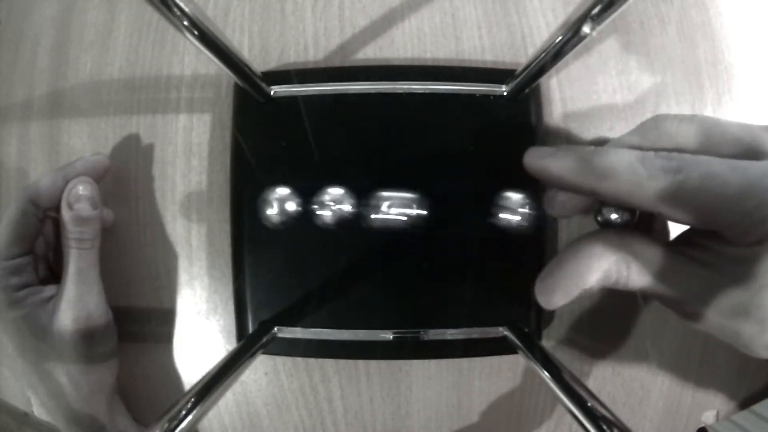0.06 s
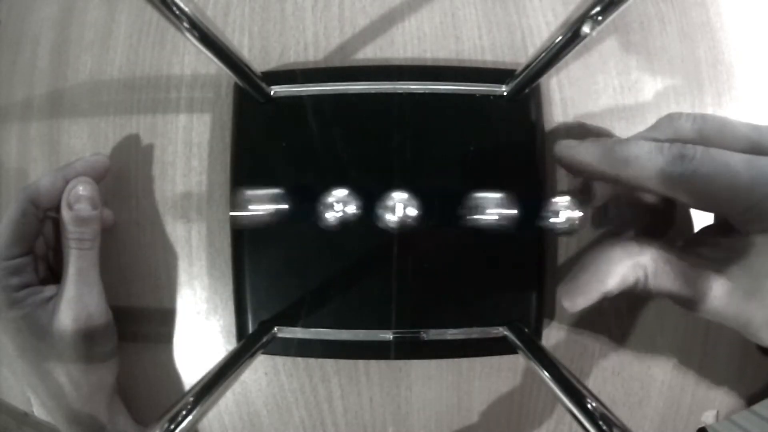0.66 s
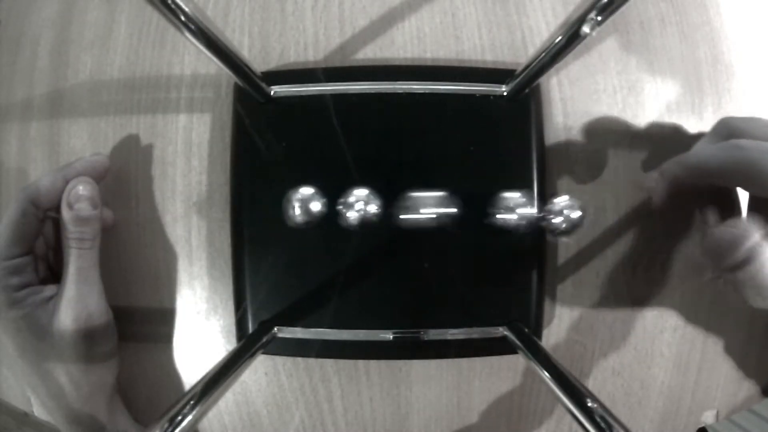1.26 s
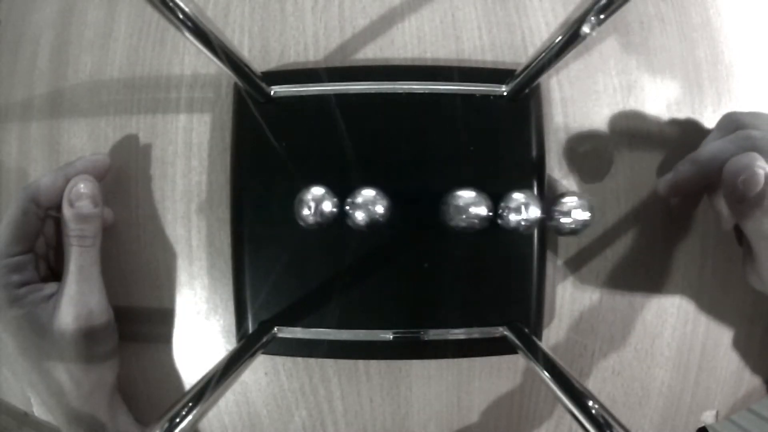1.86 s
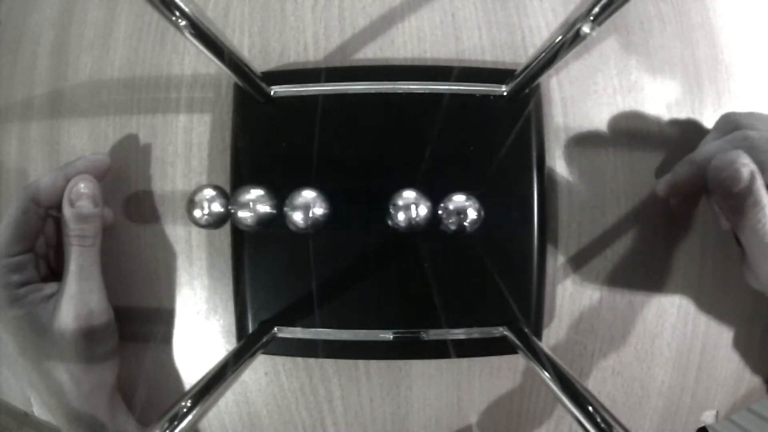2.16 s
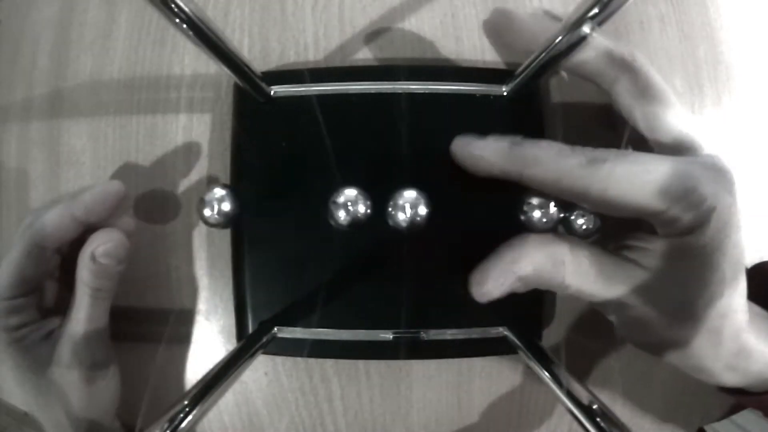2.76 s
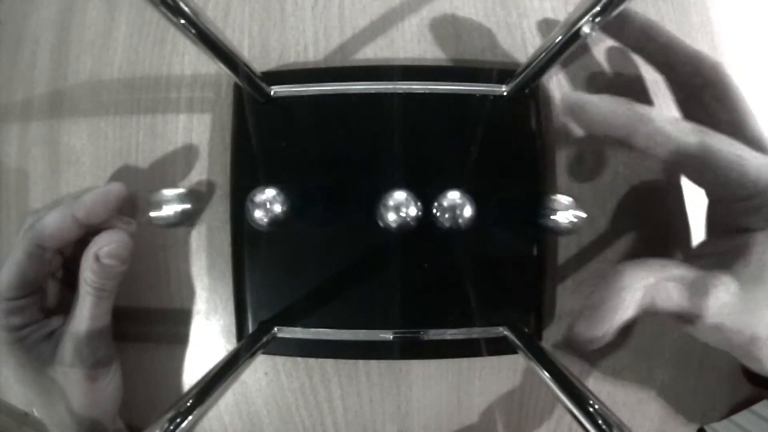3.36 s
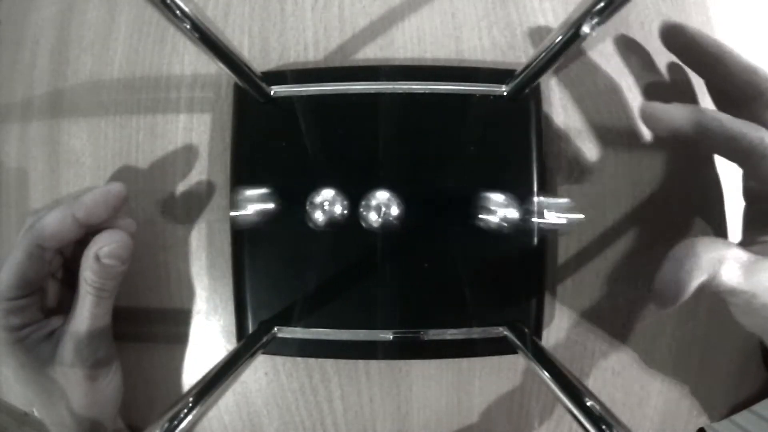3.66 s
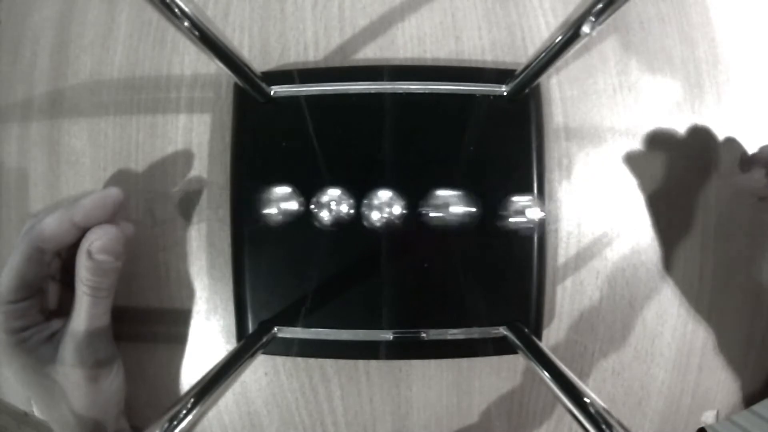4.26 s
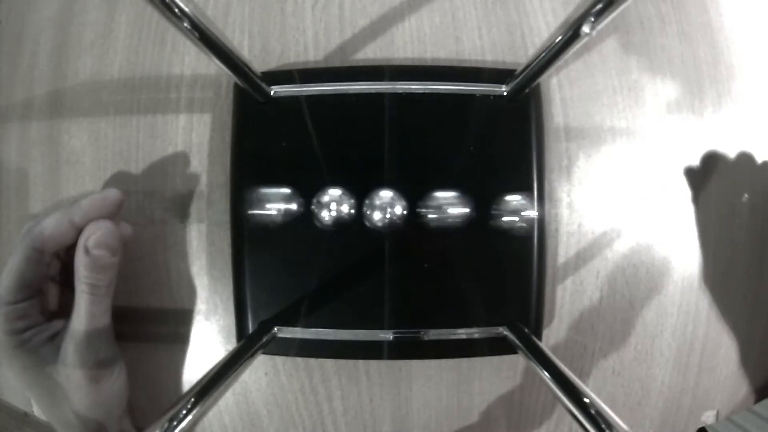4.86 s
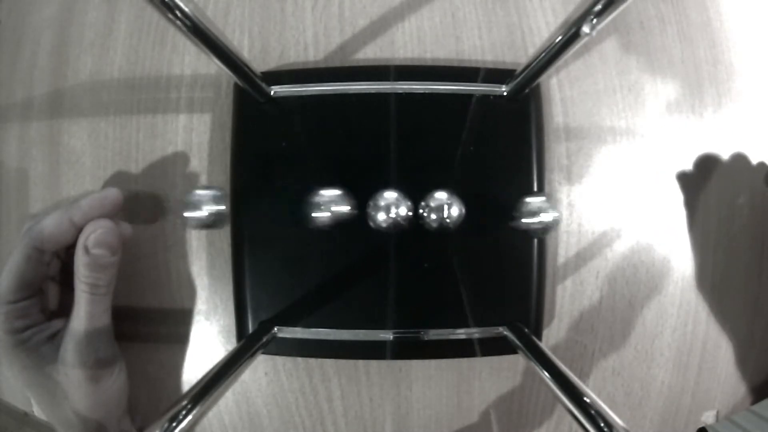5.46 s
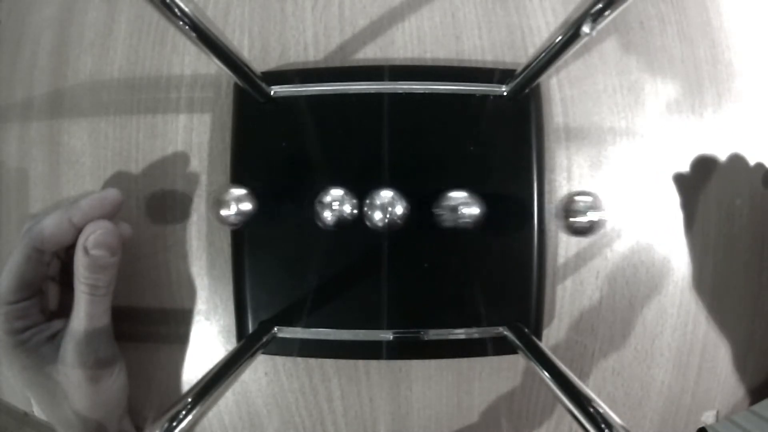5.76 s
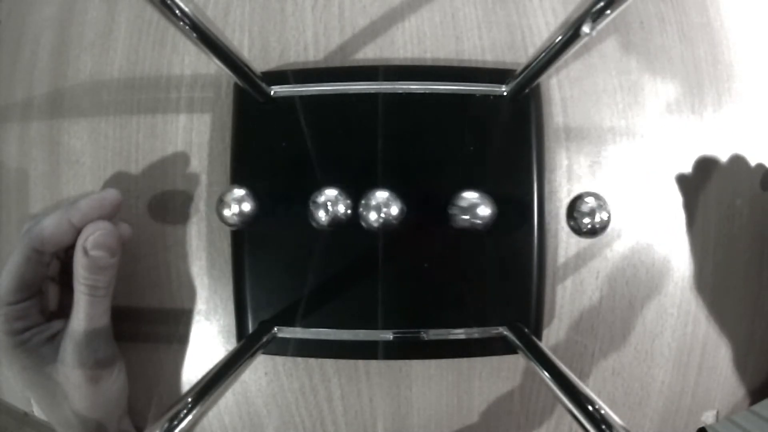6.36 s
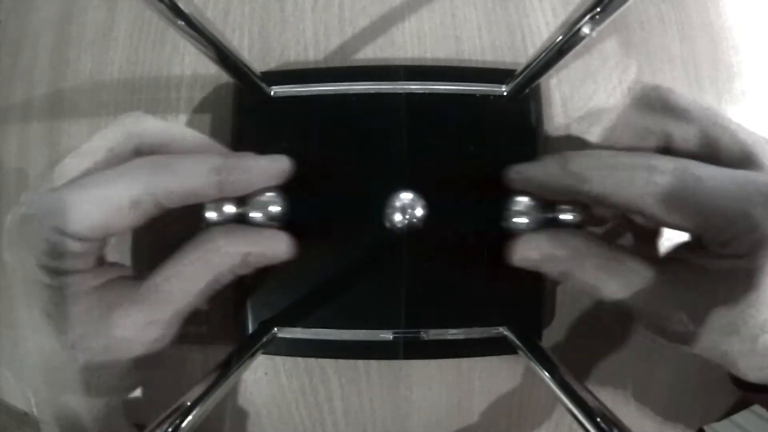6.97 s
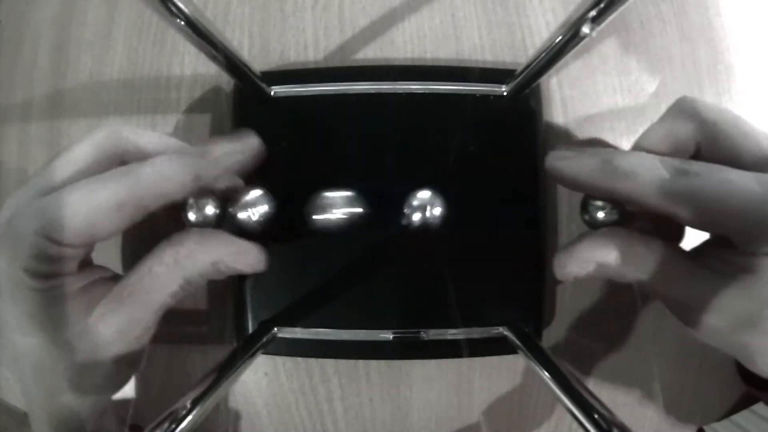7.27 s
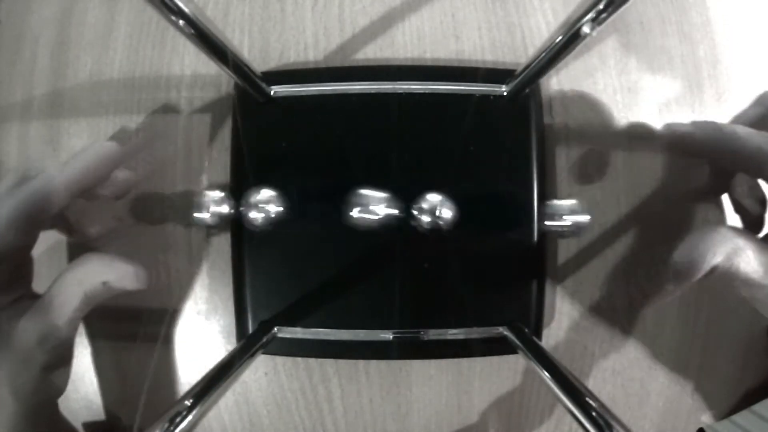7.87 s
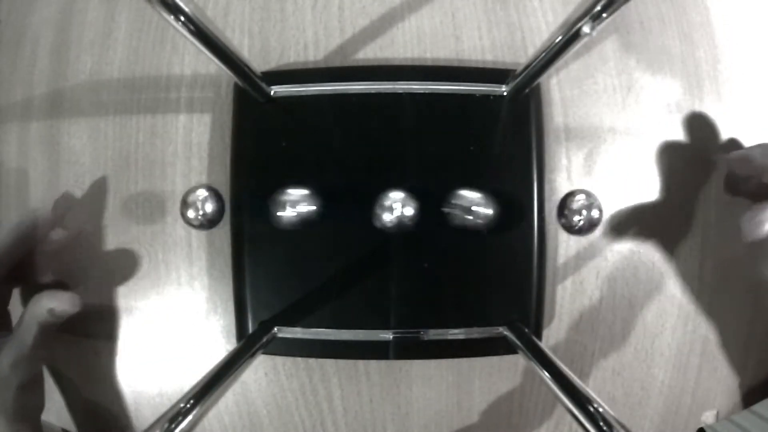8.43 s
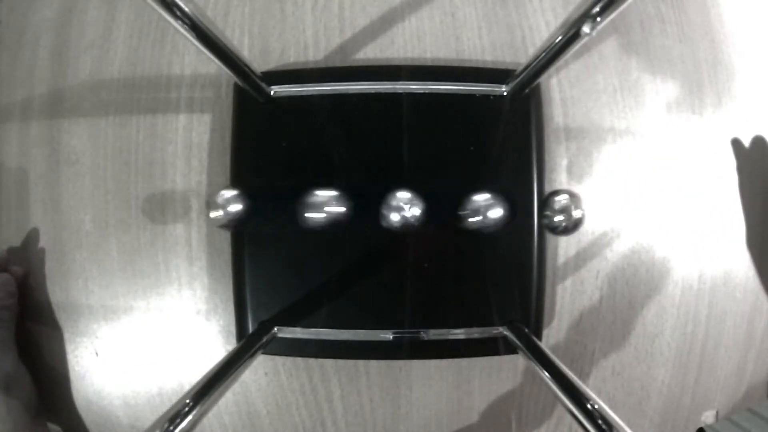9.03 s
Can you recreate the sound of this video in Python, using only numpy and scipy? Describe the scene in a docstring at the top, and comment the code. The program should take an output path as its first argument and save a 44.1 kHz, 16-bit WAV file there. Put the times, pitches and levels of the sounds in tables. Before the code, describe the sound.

Close up in a small, quiet room, a swinging-ball desk toy makes bright, irregular metal clicks with a little low rumble and creaking. After a short lull as the balls are handled, they clatter in an even rhythm of quick volleys that slowly weaken. The sound dips briefly, then a second round begins. Faint hiss, a thin whine and tiny electronic ticks lie underneath.

```python
"""A Newton's cradle on a wooden desk, heard from just above. First the steel balls clack out of step, as their
shifting load makes the base rumble and the frame creak. Fingers gather them up, then let go, and the balls
collide in fading volleys, three a second; after seven seconds a new, faster-fading run of volleys begins.
Twice, near 2.2 and 7 seconds, the whole sound briefly fades out and back in. Throughout, a nearby surface and
the small room answer each click, over hiss and a faint whine, joined by faint ticks and a drone."""
import sys
import numpy as np
from scipy import signal
from scipy.fft import rfft, irfft, next_fast_len
from scipy.io import wavfile
from scipy.ndimage import uniform_filter1d

SR = 44100
rng = np.random.default_rng(int(sys.argv[2]) if len(sys.argv) > 2 else 0)


def wrap_up_sound(samples):
    """Save the sound to the file named by the first command line argument, as 16-bit audio."""
    columns = np.atleast_2d(samples).T
    # keep every value between -1 and 1, then stretch to whole-number steps
    tamed = np.clip(columns, -1, 1)
    steps = np.round(tamed * 32767).astype(np.int16)
    wavfile.write(sys.argv[1], SR, steps)


N = 401310

# spectrum of a steel-on-steel contact: (frequency [Hz], relative level [dB])
CLICK_SPECTRUM = [(200, -41.5), (500, -15), (1000, 4.5), (1600, 0.5), (2150, 5), (2850, 4.5), (3200, 1.5),
                  (3800, 5.5), (4500, 1.5), (4950, 5), (5420, 3.5), (6600, 5.5), (8200, 2.5), (8950, 6.5),
                  (10100, -1), (11000, 0.5), (15000, -14)]
# lone contacts, out of step or in the hands:
# (time [s], relative level [dB], brightness [dB/octave], room share [dB])
SINGLE_CONTACTS = [ (0, -44.5, 4.5, 3), (.0925, -40.5, 3.5, 2), (.0991, -44, 0.5, 0.5), (.2, -39, 2, 0),
                   (.3141, -44.5, 2.5, 3), (.4227, -40, 2, 1.5), (.5159, -40.5, 0, 3.5),
                   (.557, -37.5, 4, -2.5), (.5906, -36, 3, 0.5), (.6298, -42, 3, 5.5),
                   (.6495, -40.5, .5, 1.5), (.7374, -42, 2, 4), (.8231, -39.5, 4.5, -.5),
                   (.8869, -43, 4.5, 0), (.9144, -38.5, 3, 2), (.9708, -40.5, 3, 4), (1.0573, -44, 2, 4.5),
                   (1.1325, -42, 1.5, 0.5), (1.2096, -45, 4, 0), (1.2364, -42, 3, 4),
                   (1.3014, -41.5, 4, 2.5), (1.309, -45, -0.5, 0), (1.3784, -45.5, 1, 3),
                   (1.3844, -45, 0.5, -2), (1.4398, -43.5, 2, 1), (1.5359, -48, 3, 2),
                   (1.5589, -44, 1, 3.5), (1.6365, -42.5, 2.5, 2.5), (1.6991, -42, 0.5, -0.5),
                   (1.7554, -44, 1, 0.5), (1.852, -50, 2.5, -2), (1.8795, -47.5, 2.5, 5.5),
                   (1.9655, -42, 0.5, 1), (2.0237, -43, 4.5, 0), (2.0617, -44, 2.5, 0), (2.1754, -54, 4, 6),
                   (2.1963, -49, 0.5, -4), (2.6118, -37.5, 0, -2), (2.9351, -39, 3, 1.5),
                   (2.9667, -35, 1, 2), (2.9957, -39.5, 3, -0.5), (3.3053, -30, 4.5, -1),
                   (7.2402, -41, 3, -.5), (7.3207, -36.5, 5.5, -4), (7.4101, -41.5, 3.5, -2),
                   (8.6603, -43, -0.5, 6), (8.983, -42, 2.5, 2.5)]
# contacts that recur in free swing: (first time [s], period [s], shortening [s/swing], swings [count],
# relative level [dB], loss [dB/swing], brightness [dB/octave], room share [dB])
SWING_CONTACTS = [ (3.2568, .3213, 0, 12, -40, 0.48, 1, 0.5),
                  (3.2898, .3222, .00006, 12, -35.5, 0.9, 1.5, 1.5),
                  (3.312, .324, .00011, 12, -32, 0.46, 1.7, 0),
                  (3.3496, .3252, .00019, 12, -41.5, 0.35, 3, .5),
                  (3.6312, .3242, .00011, 11, -36, -0.06, 2, 2),
                  (7.5528, .3202, .0005, 5, -42.5, 2, 2.5, 5.5), (7.568, .3226, 0, 5, -42, 1.5, 4.5, -1.5),
                  (7.6021, .3264, .0008, 5, -34.5, 1.4, 4, 1),
                  (7.629, .3268, .00076, 5, -38.5, 1.3, 1.5, 6.5), (7.6481, .3227, 0, 5, -35, 0.8, 2, 2.5),
                  (7.6876, .3205, 0, 5, -34.5, 1.5, 4, 1), (7.727, .317, 0.0013, 3, -43, 0.1, 1.5, 4)]
# high modes of the steel frame: (frequency [Hz], relative level [dB], 60 dB decay time [s])
STEEL_MODES = [(4868, -24, .25), (4910, -20, .25), (4965, -21, .3), (5195, -19, .15), (5275, -20, .2),
               (5942, -21, .25), (6116, -21, .25), (6498, -25, .25), (8880, -21, .04), (8965, -21, .1),
               (9110, -21, .05)]
# early reflections: (delay [s], relative level [dB], spread [s])
REFLECTIONS = [(.0042, -14, .002), (.0105, -6, .0022), (.0185, -15, .0012), (.0216, -11, .0018),
               (.027, -12, .005)]
# colour of the reflections and of the reverberation: (frequency [Hz], gain [dB])
WALL_GAIN = [(500, -3), (2800, -7), (4200, 1.5), (5200, 3), (8000, 4.5), (11000, -2.5), (15000, -1)]
ROOM_GAIN = [(300, 29), (1000, -10), (2700, -9), (4200, -3.5), (6000, -5.5), (8200, -5), (9200, -10),
             (15000, -3.5)]
# reverberation time: (frequency [Hz], 60 dB decay time [s])
ROOM_DECAY = [(300, 0.48), (2000, 0.22), (5000, 0.33), (9000, 0.29), (15000, 0.16)]
# lurches under hands and uneven swings: (time [s], hold [s], relative rumble [dB], relative creak [dB])
STAND_LURCHES = [ (0, .03, -46, -49), (0.308, .02, -43, -55), (0.564, 0.093, -42, -43),
                 (0.889, 0.036, -41.5, -49.5), (0.978, 0.045, -49, -55.5), (1.234, .01, -43.5, -48),
                 (1.552, 0.068, -41, -55.5), (1.865, 0.13, -52, -58.5), (2.95, 0.18, -55.5, -67.5),
                 (3.224, 0.14, -46.5, -57.5), (3.482, .02, -52, -77), (6.22, 0.027, -57.5, -62),
                 (6.83, 0.035, -55, -74), (6.986, 0.19, -59.5, -69), (7.266, 0.053, -48, -59),
                 (7.343, 0.023, -58, -48.5), (7.599, .15, -49.5, -49), (7.9, 0.033, -43.5, -51),
                 (8.001, 0.24, -49.5, -59.5), (8.278, 0.12, -44, -52), (8.566, 0.096, -44, -56.5),
                 (8.76, .24, -55, -61)]
# regular sway in free swing:
# (first time [s], period [s], hold [s], relative rumble [dB], relative creak [dB], loss [dB/sway])
STAND_SWAY = (4, 0.4, 0, -55.5, -61, .65)
# the base rocking on the desk: (frequency [Hz], relative level [dB])
BASE_SPECTRUM = [(20, -53), (50, -43), (66, -7), (81, 2), (96, -26), (113, -14), (140, -17), (300, -25),
                 (600, -35), (1500, -97)]
# low resonances of the frame: (frequency [Hz], bandwidth [Hz], gain [dB])
FRAME_MODES = [(190, 21, -10), (398, 117, -8), (582, 32, -11), (930, 254, -6), (899, 30, -1.5),
               (993, 25, -3), (2090, 330, -12.5), (3320, 230, -20)]
# slips in the frame: (time [s], peak level [dB], length [s], gain of the side resonances [dB])
FRAME_SLIPS = [(.586, -43.5, 0.017, -12), (0.625, -45, 0.025, -3), (0.682, -37, 0.0093, -6),
               (1.268, -44.5, .016, -12), (2.355, -53, .013, -9), (2.894, -55.5, 0.013, -20),
               (6.994, -53, .015, -8), (7.362, -41, 0.021, -31), (7.385, -43.5, .012, -20),
               (7.696, -44.5, 0.012, -12), (7.808, -42, 0.022, -11), (7.927, -45.5, 0.013, -6),
               (8.299, -45, 0.022, -7)]
# skin sliding on steel, and a finger knocking the frame: (frequency [Hz], relative level [dB])
SLIDE_SPECTRUM = [(300, -20), (600, -5), (900, 10.5), (1080, 0), (1250, 4), (1600, -13), (4000, -15),
                  (12000, -32)]
KNOCK_SPECTRUM = [(150, -23), (450, 3), (650, -7), (920, -2), (1200, -19), (1600, -6), (2000, -22),
                  (5000, -42)]
# runs of electronic ticks: (start [s], end [s])
TICK_RUNS = [(2.348, 6.9), (7.0075, 9.05)]
# partials of the electronic whine: (frequency [Hz], level [dB])
WHINE_PARTIALS = [(1997, -84), (4000, -79), (5001, -87), (5999, -79), (8000, -91)]
# distant drone: (time [s], pitch [Hz], fundamental level [dB], third harmonic level [dB])
DRONE_PATH = [(2.6, 64, -85, -90), (3.1, 66, -55, -93), (3.7, 63.7, -60.5, -92), (4.4, 50, -73, -92),
              (5.1, 51.6, -64.5, -74.5), (5.8, 52.2, -55.5, -72.5), (6.05, 55.3, -64.5, -55),
              (6.35, 54.9, -58, -68.5), (6.8, 55, -70, -65.5), (7.1, 56, -57, -72), (9.1, 58, -74, -80)]
# room rumble and hiss: (frequency [Hz], relative level [dB])
FLOOR_SPECTRUM = [(20, -5), (65, -4.5), (125, -9.5), (300, -13), (600, -17.5), (950, -22), (1500, -23),
                  (3200, -28), (4100, -26.5), (5400, -34.5), (6050, -23.5), (7200, -36.5), (9000, -34),
                  (15000, -45)]
# brief dips in level: (time [s], fall [s], recovery [s])
LEVEL_DIPS = [(2.228, 0.1, 0.078), (6.963, 0.092, 0.097)]

CRACK_S, BURST_SIZE = .0019, 1024  # a click's decay time; samples in a burst
BURST_HZ = np.fft.rfftfreq(BURST_SIZE, 1 / SR)
OCTAVES = np.log2(np.clip(BURST_HZ, 1500, 12000) / 6000)  # brightness pivots about 6 kHz


def balls(gain_db=22, room_db=-1):
    """Elastic impact: each contact radiates a crack, followed by frame ring, echoes and reverberation."""
    out = np.zeros(N)
    tails = room_tails()
    rings = [steel_ring() for _ in range(11)]
    for k, (s, db, brightness, share_db) in enumerate(contacts()):
        direct = amp(db + gain_db)
        sent = direct * amp(share_db)  # a pair of balls radiates unevenly, and hands shade it
        colour = along(CLICK_SPECTRUM, BURST_HZ) + brightness * OCTAVES  # shorter contacts are brighter
        reflected = colour + along(WALL_GAIN, BURST_HZ)
        add(out, s, direct * burst(colour, CRACK_S))
        add(out, s, sent * rings[k % len(rings)])
        for delay, echo_db, spread in REFLECTIONS:
            add(out, s + delay, sent * amp(echo_db) * burst(reflected, spread))
        # the room gathers sound from all directions, so its colour is smooth
        pulse = unit_energy(np.fft.fftshift(irfft(amp(colour)))[384:640])
        add(out, s, sent * amp(room_db) * signal.oaconvolve(pulse, tails[k % len(tails)]))
    return out


def contacts(scatter_db=-0.5, scatter_db_per_octave=0.48):
    """Pendulum motion: contacts recur, the period shortening as the swing dies; lone ones join them."""
    rows = list(SINGLE_CONTACTS)
    for first, period, shortening, swings, db, loss_db, brightness, share_db in SWING_CONTACTS:
        for k, (force, edge) in enumerate(rng.standard_normal((round(swings), 2))):
            s = first + k * (period - k * shortening)
            level_db = db - k * loss_db + scatter_db * force
            rows.append((s, level_db, brightness + scatter_db_per_octave * edge, share_db))
    return rows


def burst(colour_db, decay_s):
    """Scattering smears an impulse in time but keeps its broad colour; the result has energy 1."""
    t = np.arange(BURST_SIZE) / SR
    cepstrum = irfft(np.log(amp(colour_db)))
    cepstrum[1:BURST_SIZE // 2] *= 2  # folding gives a causal, minimum-phase response
    cepstrum[BURST_SIZE // 2 + 1:] = 0
    attack = 1 - np.exp(-t / .00015)
    envelope = attack * (np.exp(-(t / decay_s) ** 2) + .11 * np.exp(-t / .009))
    scatter = rfft(rng.standard_normal(BURST_SIZE) * envelope)
    scatter /= np.sqrt(uniform_filter1d(np.abs(scatter) ** 2, size=60))
    return unit_energy(irfft(scatter * np.exp(rfft(cepstrum))))


def steel_ring():
    """Free vibration: the frame's high modes decay exponentially, each from a random strength."""
    t = np.arange(SR // 3) / SR
    ring = np.zeros(len(t))
    for hz, db, t60 in STEEL_MODES:
        mode = np.sin(2 * np.pi * (hz * t + rng.random())) * amp(-60 * t / t60)
        ring += amp(db + 2 * rng.standard_normal()) * unit_energy(mode)
    return ring


def room_tails(fresh=0.57):
    """Partial coherence: the balls meet at slightly different places, so only part of a tail repeats."""
    shared = diffuse_tail()
    tails = [(shared + fresh * diffuse_tail()) / np.hypot(1, fresh) for _ in range(12)]
    return [filtered(tail, lambda hz: amp(along(ROOM_GAIN, hz))) for tail in tails]


def diffuse_tail(onset_s=0.011, build_s=0.015):
    """Reverberation: a diffuse field builds up, then decays at a rate that depends on frequency."""
    hz, t, spectra = signal.stft(rng.standard_normal(SR // 2), SR, nperseg=256)
    decay = amp(-60 * t / along(ROOM_DECAY, hz)[:, None])
    tail = signal.istft(spectra * decay, SR, nperseg=256)[1]
    tail *= np.clip((np.arange(len(tail)) / SR - onset_s) / build_s, 0, 1)
    return unit_energy(tail)


def stand(creak_db=-1, soft_hz=1700, low_hz=55, high_hz=130):
    """Forced vibration: the swinging load rocks the base and rubs the frame into its resonances."""
    rumble_gain, creak_gain = strain()
    rub = filtered(rng.standard_normal(N),
                   lambda hz: frame_response(hz, side_db=-1.5) / (1 + (hz / soft_hz) ** 4))
    rumble = rumble_gain * steadied(noise(BASE_SPECTRUM, N), span_s=0.094)
    # the desk passes only a narrow low band, however sudden the push
    desk = lambda hz: (hz / low_hz) ** 4 / (1 + (hz / low_hz) ** 4) / (1 + (hz / high_hz) ** 8)
    return filtered(rumble, desk) + creak_gain * amp(creak_db) * steadied(unit_rms(rub), span_s=0.066)


def strain(attack_s=0.023, rumble_release_s=0.061, creak_release_s=0.066):
    """Incoherent addition: lurches and sways rise, hold and die away, and their powers sum."""
    first, period, hold, rumble_db, creak_db, loss_db = STAND_SWAY
    sways = [(first + k * period, hold, rumble_db - k * loss_db, creak_db - k * loss_db)
             for k in range(11)]
    rumble_power, creak_power = np.zeros(N), np.zeros(N)
    t = np.arange(SR) / SR
    rise = np.clip(t / attack_s, 0, 1)
    for s, hold, rumble_db, creak_db in STAND_LURCHES + sways:
        released = np.maximum(t - attack_s - hold, 0)
        add(rumble_power, s, (amp(rumble_db) * rise * np.exp(-released / rumble_release_s)) ** 2)
        add(creak_power, s, (amp(creak_db) * rise * np.exp(-released / creak_release_s)) ** 2)
    return np.sqrt(rumble_power), np.sqrt(creak_power)


def creaks():
    """Stick-slip friction: each sudden slip drives a short rasp through the frame's resonances."""
    out, t = np.zeros(N), np.arange(SR // 5) / SR
    for s, db, length, side_db in FRAME_SLIPS:
        age = 3 * t / length
        envelope = age * np.exp(1 - age)
        rasp = filtered(rng.standard_normal(len(t)), lambda hz: frame_response(hz, side_db))
        add(out, s, amp(db) * envelope * steadied(unit_rms(rasp), span_s=0.014))
    return out


def frame_response(hz, side_db):
    """Modal superposition: resonance peaks add; a sharper slip excites more beside the main ring."""
    gain = 0
    for centre, width, db in FRAME_MODES:
        main_ring = 750 < centre < 1200 and width < 100
        gain += amp(db if main_ring else db + side_db) / (1 + (2 * (hz - centre) / width) ** 2)
    return gain


def finger_slide(start_s=2.26, peak_s=2.345, end_s=2.68, level_db=-59):
    """Sliding friction: skin on steel makes a swell of noise as fingers gather the balls."""
    stroke = np.interp(np.arange(N) / SR, [start_s, peak_s, end_s], [0, 1, 0])
    return amp(level_db) * stroke * steadied(noise(SLIDE_SPECTRUM, N), span_s=0.026)


def finger_knock(s=3.228, level_db=-49, decay_s=0.02):
    """Damped impact: a finger knocks the frame as it lets go."""
    out, t = np.zeros(N), np.arange(SR // 8) / SR
    thud = steadied(noise(KNOCK_SPECTRUM, len(t)), span_s=.01)
    add(out, s, amp(level_db) * np.exp(-t / decay_s) * thud)
    return out


def ticks(period_s=.1024, energy_db=-36.5, db_per_octave=-2):
    """A periodic pulse train: faint electronic ticks, slow enough to be heard one by one."""
    out = np.zeros(N)
    colour = along(CLICK_SPECTRUM, BURST_HZ) + db_per_octave * OCTAVES
    for start, end in TICK_RUNS:
        for s in np.arange(start, end, period_s):
            add(out, s, amp(energy_db + rng.standard_normal()) * burst(colour, CRACK_S))
    return out


def background(floor_db=-59):
    """Superposition: a thin electronic whine and a distant drone lie over room rumble and hiss."""
    t = np.arange(N) / SR
    whine = sum(amp(db) * flutter() * np.sin(2 * np.pi * hz * t) for hz, db in WHINE_PARTIALS)
    times, *columns = np.transpose(DRONE_PATH)
    pitch, fundamental_db, third_db = [np.interp(t, times, column) for column in columns]
    phase = 2 * np.pi * np.cumsum(pitch) / SR
    drone = amp(fundamental_db) * flutter() * np.sin(phase) + amp(third_db) * np.sin(3 * phase)
    return amp(floor_db) * noise(FLOOR_SPECTRUM, N) + np.sqrt(2) * (whine + drone)


def flutter(depth=0.52, corner_hz=25):
    """Amplitude modulation: a gain that wavers randomly about 1."""
    waver = filtered(rng.standard_normal(N), lambda hz: 1 / (1 + (hz / corner_hz) ** 2))
    return 1 + depth * unit_rms(waver)


def amp(db):
    """Decibels to gain."""
    return 10 ** (np.asarray(db) / 20)


def unit_rms(x):
    """x at mean power 1."""
    return x / np.sqrt(np.mean(x ** 2) + 1e-20)


def unit_energy(x):
    """x at total energy 1."""
    return x / np.linalg.norm(x)


def along(points, hz):
    """Interpolation of (frequency [Hz], value) points on a log axis."""
    frequencies, values = np.transpose(points)
    return np.interp(np.log(hz + 1), np.log(frequencies + 1), values)


def filtered(x, response):
    """Linear filtering: the spectrum of x times a frequency response."""
    size = next_fast_len(len(x) + 4096)
    return irfft(rfft(x, size) * response(np.fft.rfftfreq(size, 1 / SR)), size)[:len(x)]


def noise(spectrum, size):
    """Spectral shaping: coloured noise of rms 1."""
    return unit_rms(filtered(rng.standard_normal(size), lambda hz: amp(along(spectrum, hz))))


def steadied(x, span_s):
    """Division by the running rms evens out swells slower than span_s."""
    power = uniform_filter1d(x * x, max(int(span_s * SR), 2))
    return x / np.sqrt(np.abs(power) + 1e-9)


def add(track, s, x):
    """Superpose x on the track at time s."""
    i = int(np.clip(round(s * SR), 0, N - 1))
    track[i:i + len(x)] += x[:N - i]


def scene():
    """Sound pressures add: the cradle, the hands and the room, in mono."""
    return (balls() + stand() + creaks() + finger_slide() + finger_knock() + ticks() + background())[None]


def record(dry, dip_curve=0.97, top_hz=15600):
    """Attenuation: the level twice dips briefly to nothing, and a steep low-pass limits the band."""
    t = np.arange(N) / SR
    gain = np.ones(N)
    for s, fall, recovery in LEVEL_DIPS:
        gain *= np.clip(np.maximum((s - t) / fall, (t - s) / recovery), 0, 1) ** dip_curve
    return filtered(dry[0] * gain, lambda hz: 1 / (1 + (hz / top_hz) ** 80))[None]


dry = scene()
out = record(dry)
wrap_up_sound(out)
```